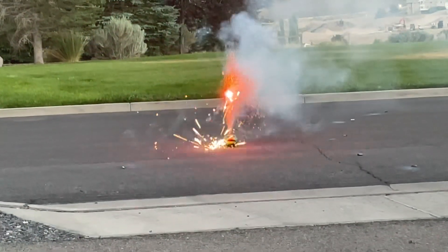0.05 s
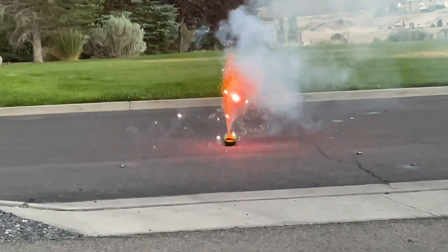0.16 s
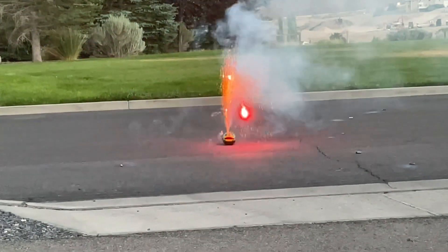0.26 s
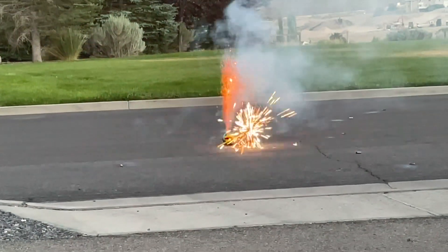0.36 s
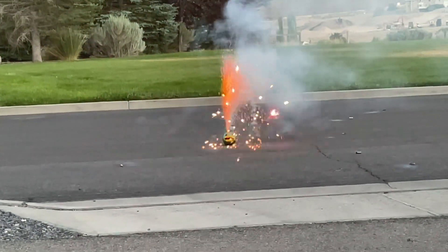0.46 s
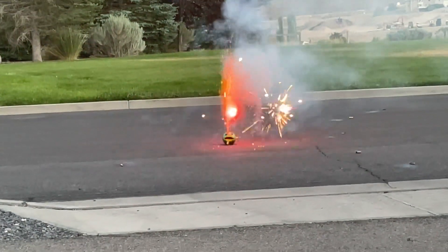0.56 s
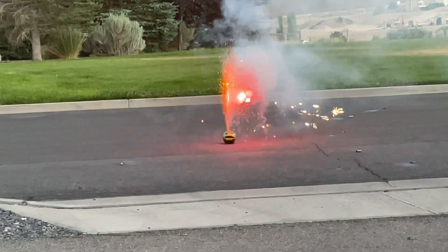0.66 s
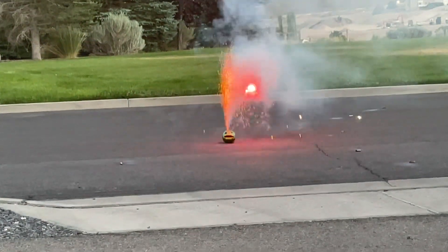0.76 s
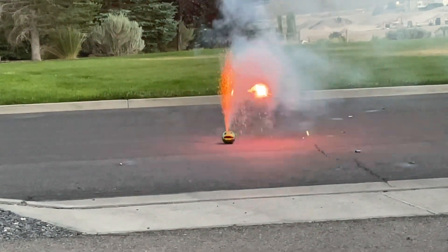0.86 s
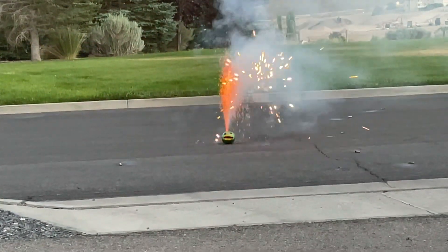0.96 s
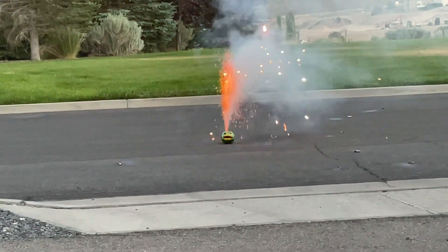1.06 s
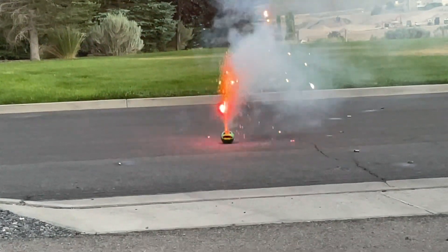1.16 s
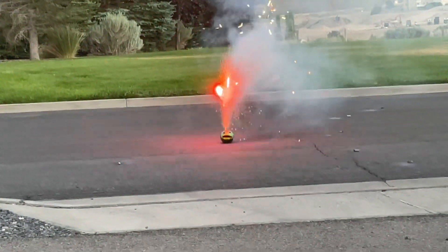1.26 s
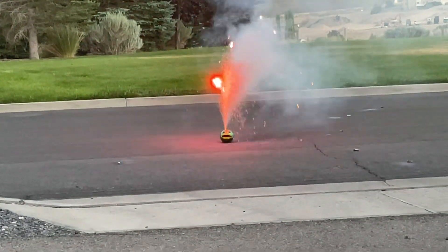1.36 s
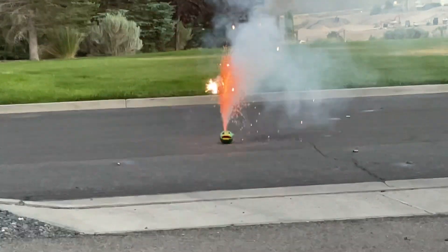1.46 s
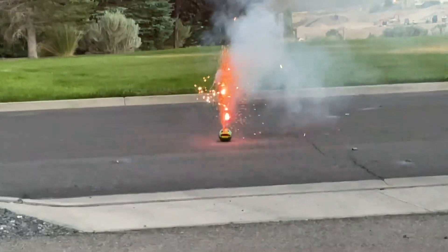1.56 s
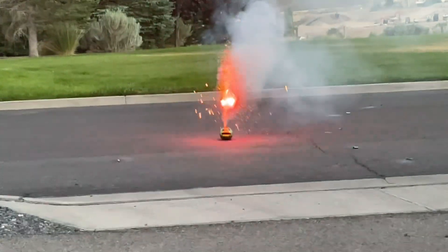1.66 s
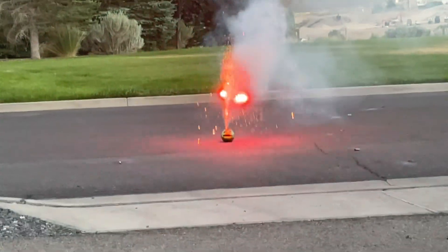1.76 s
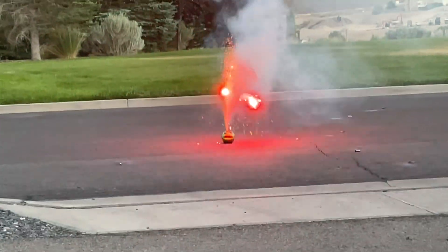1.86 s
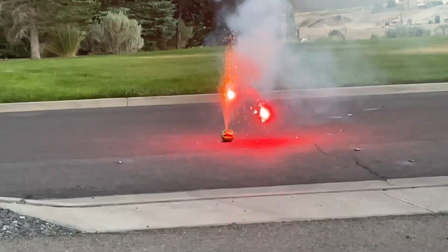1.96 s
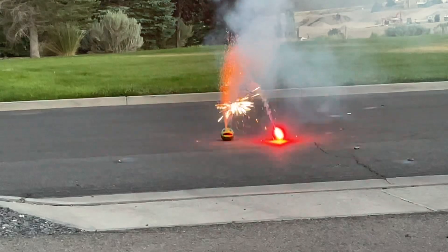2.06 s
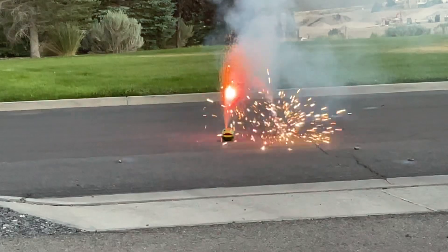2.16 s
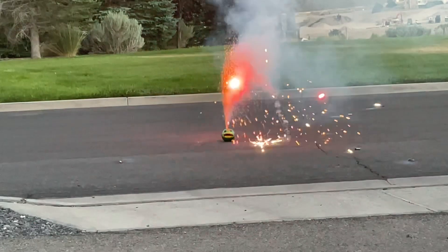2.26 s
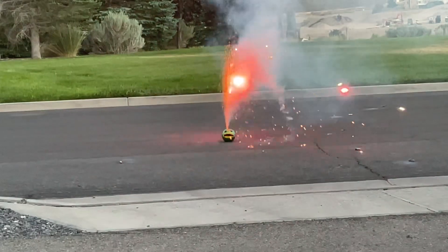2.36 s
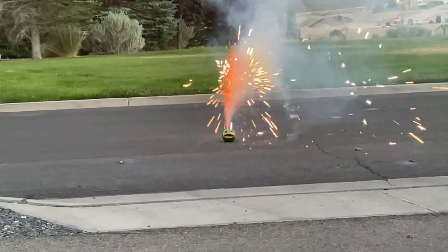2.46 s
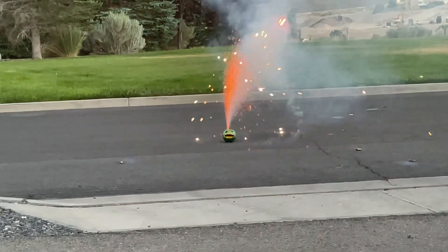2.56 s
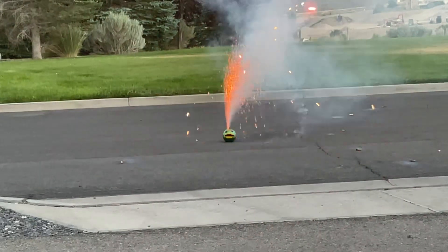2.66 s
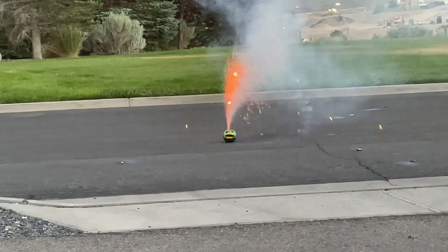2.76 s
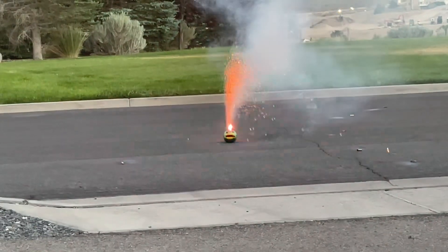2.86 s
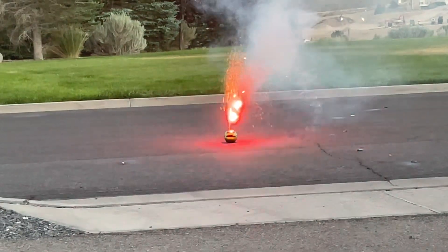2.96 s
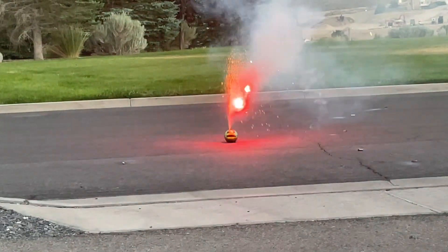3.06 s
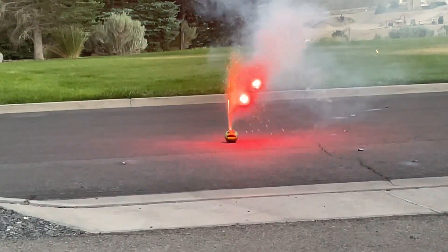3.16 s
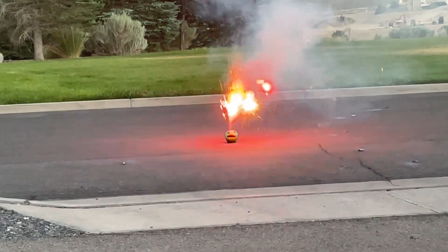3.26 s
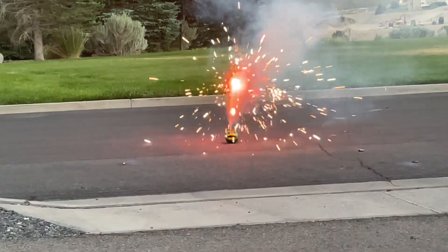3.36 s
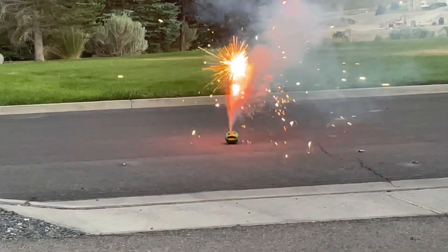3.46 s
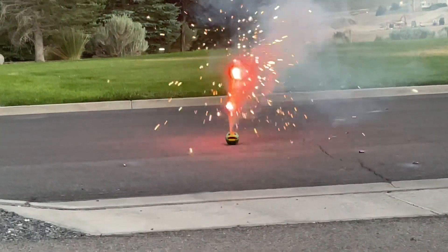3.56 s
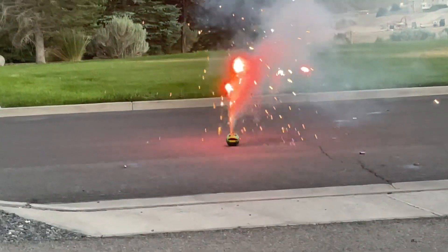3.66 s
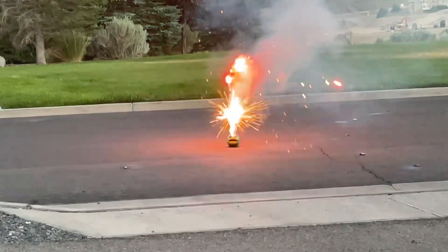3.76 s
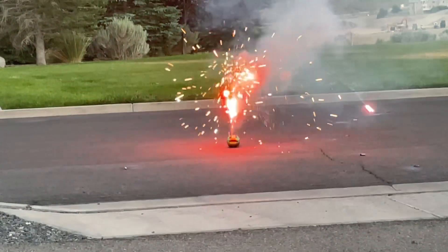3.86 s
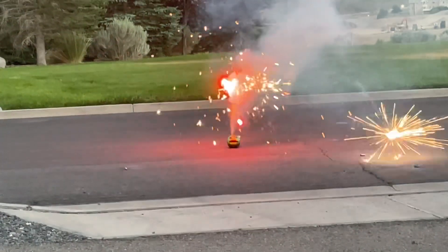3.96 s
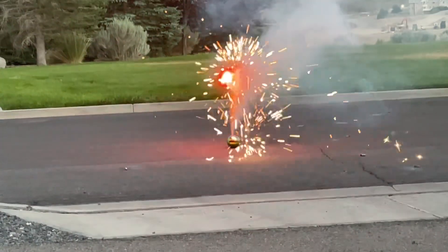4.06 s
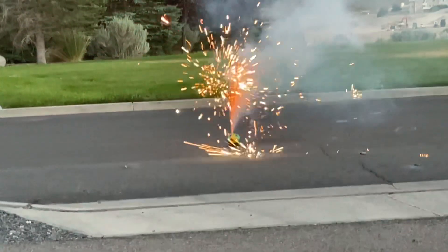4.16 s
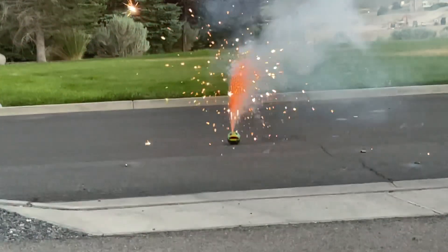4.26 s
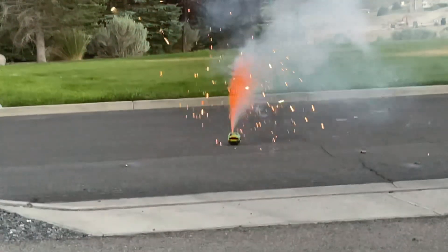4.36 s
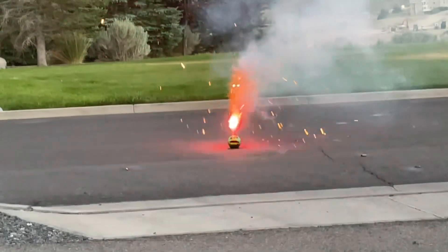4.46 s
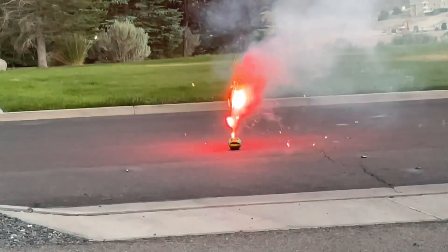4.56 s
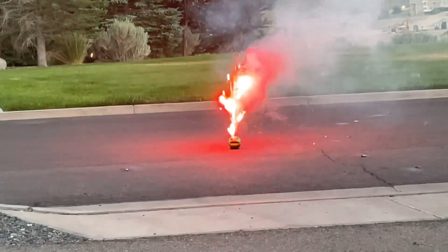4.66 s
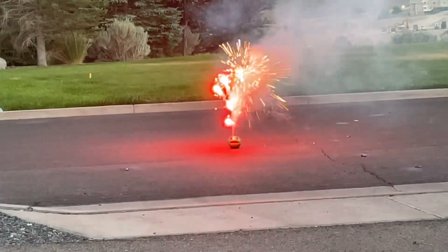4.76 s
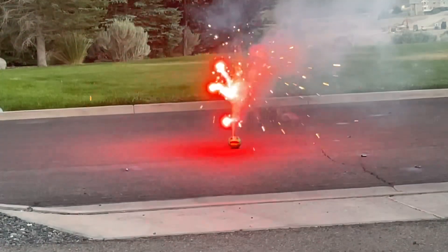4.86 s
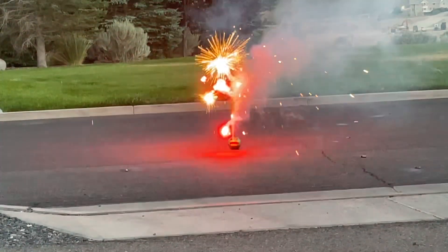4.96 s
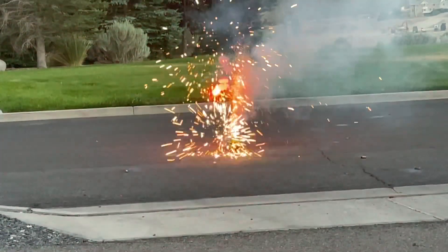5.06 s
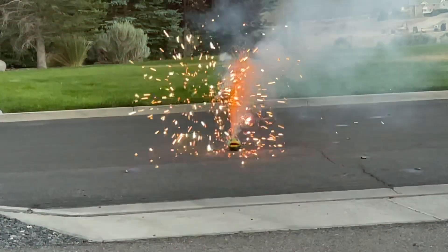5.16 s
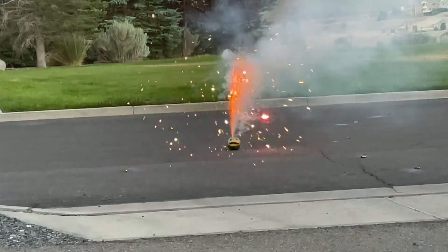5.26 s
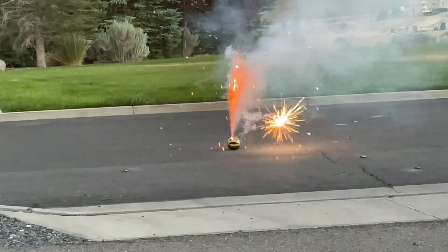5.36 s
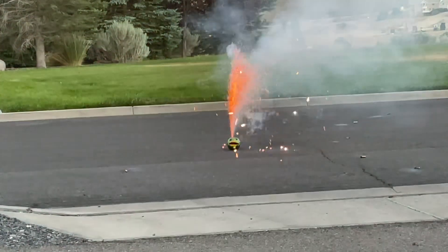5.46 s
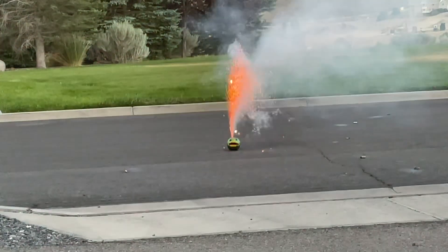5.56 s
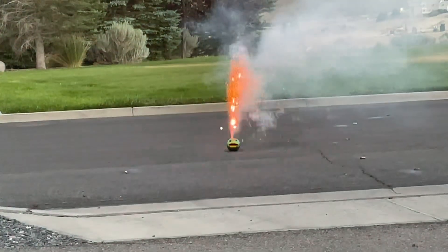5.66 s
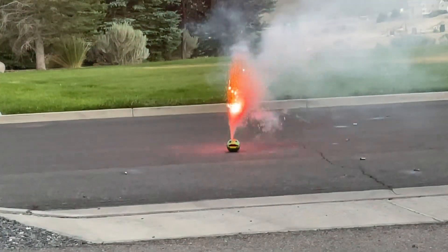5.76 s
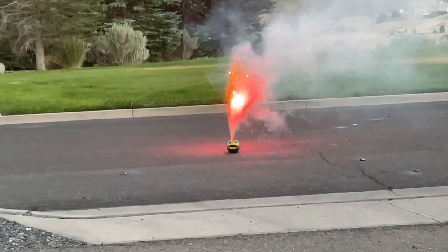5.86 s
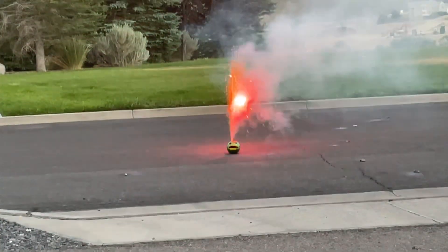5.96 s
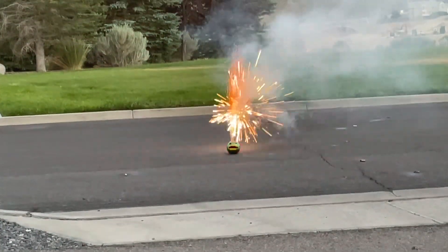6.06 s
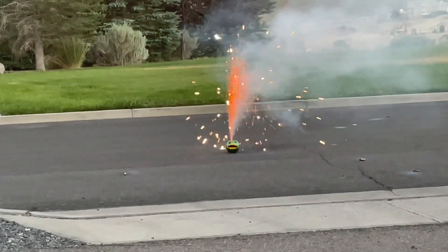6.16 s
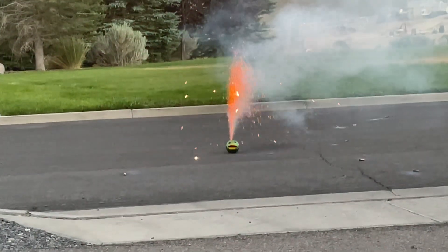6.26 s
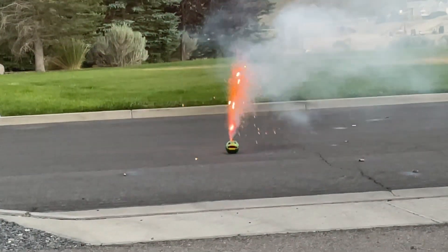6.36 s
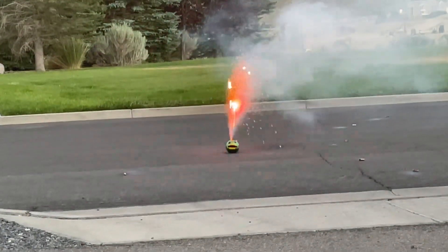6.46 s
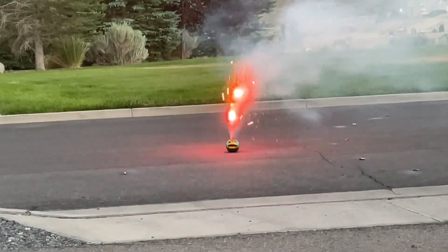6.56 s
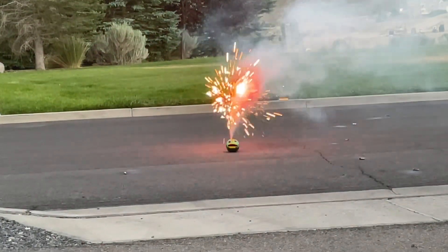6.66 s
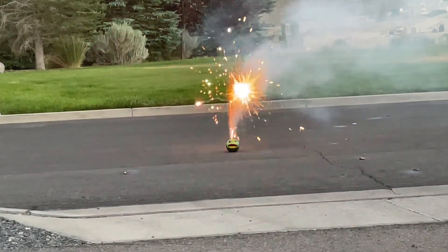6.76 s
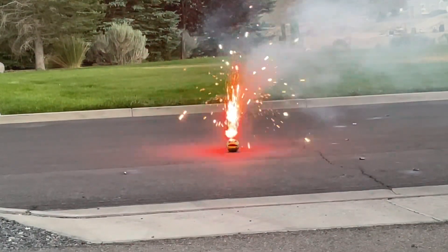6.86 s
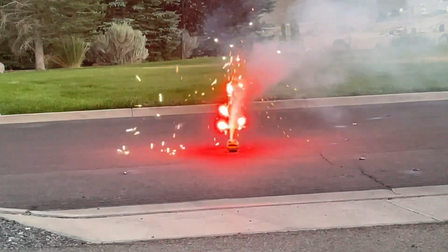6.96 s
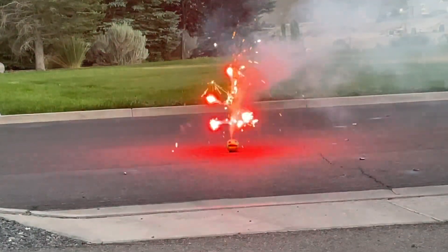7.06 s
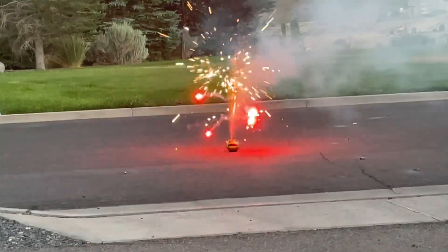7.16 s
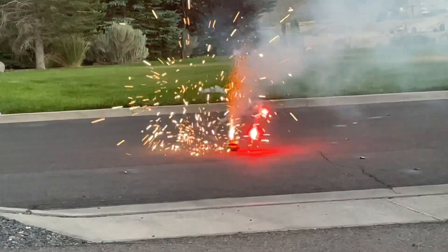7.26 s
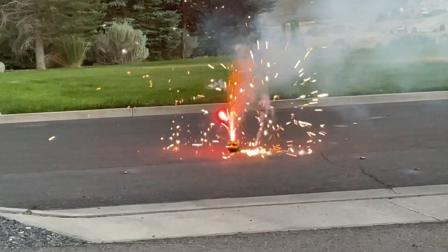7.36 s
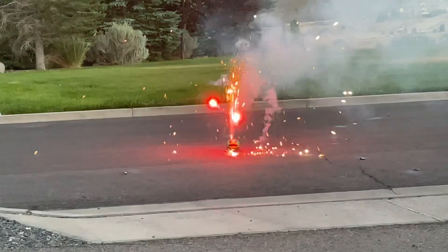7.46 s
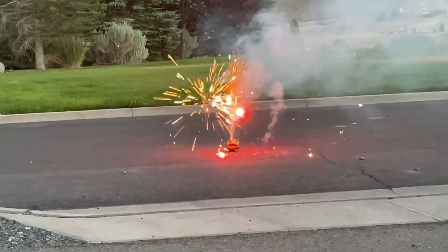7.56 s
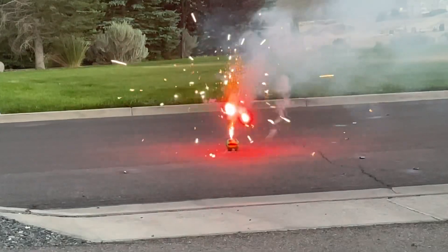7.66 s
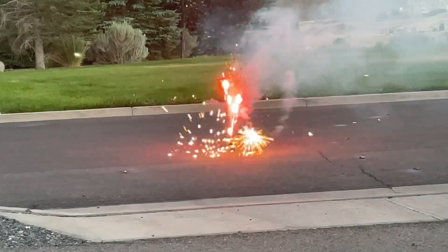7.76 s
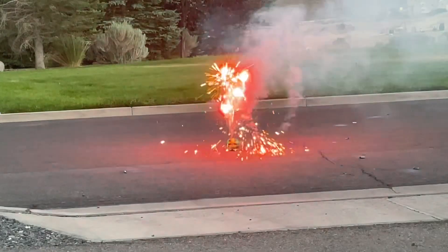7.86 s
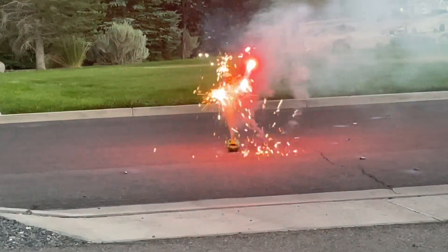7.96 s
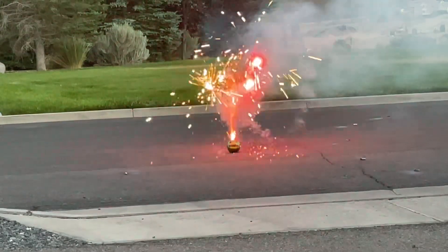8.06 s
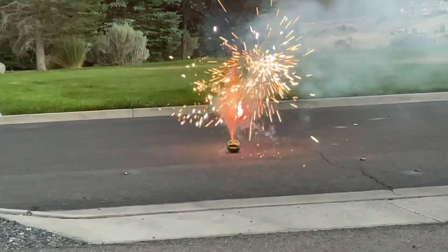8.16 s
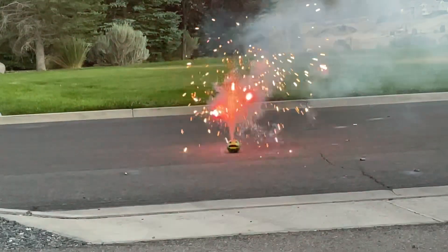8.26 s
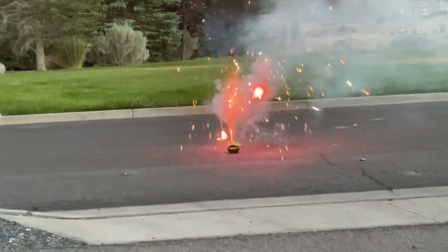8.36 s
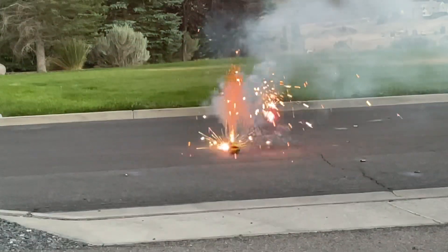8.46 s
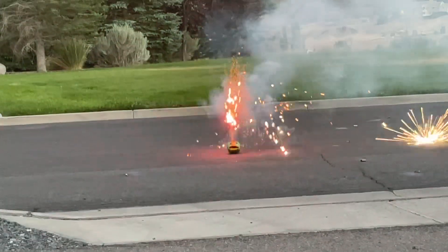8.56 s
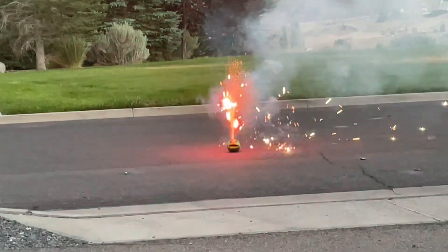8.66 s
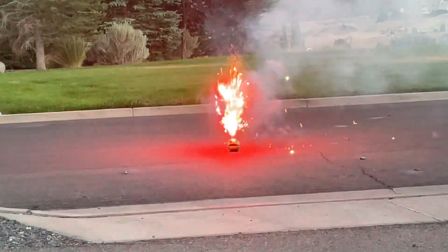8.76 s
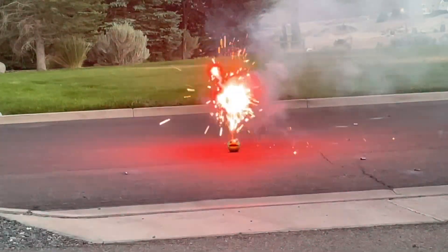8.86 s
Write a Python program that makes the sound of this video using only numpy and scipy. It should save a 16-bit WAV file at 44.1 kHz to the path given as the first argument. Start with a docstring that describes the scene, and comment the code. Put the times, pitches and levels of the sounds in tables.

```python
"""A sharp pop comes almost at once, over a soft hiss and a quiet street's wash, low rumble and faint hum.
A small fountain firework burns on the asphalt a few metres from a two-port microphone.
Its jet and the street are coloured noise that wanders in level; the hum is a wavering sine tone.
Thrown stars burst as shock fronts with crackle and sparks; each bounces off the road,
slaps back from the surroundings and dies away outdoors."""
import sys
import numpy as np
from scipy import signal
from scipy.fft import rfft, irfft, next_fast_len
from scipy.io import wavfile
from scipy.ndimage import uniform_filter1d

SR = 44100
rng = np.random.default_rng(int(sys.argv[2]) if len(sys.argv) > 2 else 0)


def to_wav(s):
    """Save 16-bit WAV."""
    ch = np.atleast_2d(s).T  # columns
    pcm = np.round(np.clip(ch, -1, 1) * 32767)  # PCM
    wavfile.write(sys.argv[1], SR, pcm.astype(np.int16))


N = 393813

# the street's distant wash: (frequency [Hz], relative level [dB per Hz])
WASH_COLOUR = [(20, -44), (150, -3.5), (330, 3.5), (450, -2.5), (580, -6.5), (830, -0.5), (1200, -2),
               (1550, -7.5), (2150, -20.5), (3000, -27.5), (6000, -60)]
# the street's low rumble: (frequency [Hz], relative level [dB per Hz])
RUMBLE_COLOUR = [(10, -65.5), (22, -29.5), (35, -20.5), (55, -2), (72, 0), (88, 3.5), (110, 1.5),
                 (130, -5.5), (155, -10), (220, -19.5), (260, -19), (400, -30), (900, -63.5)]
# one low swell in the rumble: (time of peak [s], half length [s], rise [dB])
RUMBLE_SWELL = (3.74, 0.12, 8.7)
# level of the rumble and the typical size of its slow wander
RUMBLE_DB, RUMBLE_WANDER_DB = -50.5, 1.1
# pitch and level of the faint hum, around which it wavers
HUM_HZ, HUM_DB = 120.5, -52.5

# distinct echoes: (delay [s], level [dB], smear [s])
SLAPS = [(0.016, -22, 0.0034), (.038, -25.5, 0.0044), (0.0411, -22.5, 0.002), (.126, -41, .004)]
# colour of the scatter from kerbs, trees and houses: (frequency [Hz], gain [dB])
SCATTER_COLOUR = [(100, 8), (300, -1.5), (1000, 2), (3000, 5), (7000, 8.5), (10000, -2.5), (14000, 4)]
# how long the street's echo takes to fall by 60 dB: (frequency [Hz], time [s])
STREET_DECAY = [(150, 0.53), (1000, 0.31), (3000, 0.49), (6500, 0.35), (14000, 0.28)]

# how hard the fountain burns: (time [s], level of its hiss before flutter and surge [dB])
BURN_CURVE = [(0, -68.5), (1.1, -67), (1.9, -67), (2.6, -74), (2.9, -66), (3.65, -62), (4.4, -64.5),
              (4.8, -62), (5.8, -65), (6.0, -69.5), (6.45, -67.5), (6.7, -62.5), (8.93, -59.5)]
# the jet's hiss: (frequency [Hz], relative level [dB per Hz])
HISS_COLOUR = [(1200, -12), (2200, 1.5), (2700, 5), (3100, -8.5), (3700, -2.5), (4400, -10.5), (5200, -19),
               (6500, -35), (9000, -38)]
# the fizz of the flaring flame: (frequency [Hz], relative level [dB per Hz])
FIZZ_COLOUR = [(3000, -15.5), (5000, 6), (7500, -2), (10000, -12), (13000, 1), (16000, -5)]
# the fizz grows faster than the hiss: its level when the hiss is at FULL_BURN_DB, and dB per dB of hiss
FULL_BURN_DB, FIZZ_DB, FIZZ_GROWTH = -62, -74, 3.9

# bursting stars: (time [s], level [dB], weight: + a deep boom, - a thin crack [dB],
# knock: fullness near 1 kHz [dB], height above the road [m])
STAR_BURSTS = [(0.0607, -11.5, -5, -0.5, 0.6), (0.3378, -34.0, 6.5, 2.5, 0.96),
               (0.361, -13, 0.5, 2.5, 0.57), (0.569, -25, 0, 0, 0.523), (0.666, -35.5, 1, 3.5, 0.49),
               (0.8907, -15.5, -0.5, 0.5, 0.29), (1.219, -24.5, -2, 1.5, 0.58), (1.26, -23, -14, 0.5, 0.55),
               (1.5311, -47.5, -14, 1, 0.424), (1.611, -33.5, -0.5, -5.5, 1.1),
               (2.063, -35.5, 4.5, 2, 0.71), (2.0991, -12.5, -0.5, 1, 0.58), (2.2656, -31, -1.5, 2.5, 0.64),
               (2.4331, -9.5, -0.5, -4, 1.1), (2.7013, -38, -5.5, 1, 0.49), (3.2914, -9.5, 0, -2.5, 0.6),
               (3.4105, -22.0, 0, -1.5, 0.68), (3.48, -18.5, 2.5, -8, 0.88), (3.5024, -17.5, -7, -1, 0.56),
               (3.7828, -17.5, 1.5, 1.5, 0.42), (3.9479, -24, 6, -2, 0.72), (3.9786, -10.5, -3, 2.5, 1.15),
               (4.0404, -20, 6, 1, 0.77), (4.0491, -16, -7, 1, 0.28), (4.0596, -24, -5, -3.5, 0.45),
               (4.119, -32.5, 6.5, -2, 1.1), (4.1678, -13.5, -1.5, 4, 0.57), (4.7495, -30.5, 1.5, 1, 0.48),
               (4.9722, -30, 6.5, 6, 0.49), (4.9934, -18, 2, -3, 0.8), (5.0408, -16, 1, 4.5, 0.58),
               (5.1101, -15, 3.5, -4.5, 0.8), (5.1267, -11.5, 0.5, 0, 0.85), (5.3852, -17.5, 1.5, 1, 0.67),
               (6.0664, -20, 3.5, -3, 0.738), (6.6377, -26.5, 5, 4, 0.3), (6.7827, -26, 3.5, -6.5, 0.29),
               (6.944, -13.0, 2.5, 1, 0.55), (7.037, -29, -4.5, -3.5, 0.48), (7.0831, -35, -8, -9, 0.67),
               (7.1281, -13, -1.5, -0.5, 0.39), (7.223, -18.0, 9.5, 7.5, 0.57),
               (7.2248, -8.5, -2, -6.5, 0.93), (7.3289, -11, -1, -2, 0.576), (7.3538, -20.5, 5.5, 4, 0.72),
               (7.566, -16, 0.5, -4.5, 0.84), (7.639, -9.0, -3, -1, 0.341), (7.7184, -17.0, 0, 1, 0.36),
               (7.7225, -17.5, 1.5, 3.5, 0.68), (7.7761, -29.5, 6, 4, 0.49), (7.858, -31.5, 5, -2, 0.45),
               (7.9463, -20, -3.5, 0, 0.55), (7.9934, -22.5, -0.5, -2.5, 0.32), (8.0018, -20.5, -4, -8, 1),
               (8.019, -21, -3.5, -6, 0.81), (8.0454, -14, -3, -3.5, 0.89), (8.0845, -21.5, -1, -3, 0.34),
               (8.1221, -16.5, -2, -4, 0.3), (8.1393, -19, -6, -3, 0.34), (8.145, -21.5, 6, 3.5, 1.15),
               (8.2538, -31, -4.5, -4.5, 0.555), (8.3422, -17, 3, 0.5, 0.596), (8.4084, -33, 4, 6, 0.696),
               (8.4186, -22.0, 4, 1.5, 0.31), (8.4953, -14, -0.5, 5.5, 0.62), (8.5864, -9, -6, 0, 0.55),
               (8.612, -18, 3, 7.5, 0.54), (8.8438, -25.5, 5, -2, 1)]
# colour of a burst: (frequency [Hz], gain [dB])
BLAST_COLOUR = [(40, -4.5), (100, 23.5), (200, 30), (340, 35), (640, 28), (800, 34), (1250, 29.5),
                (1600, 24), (2200, 19.5), (2750, 22.5), (3300, 18), (6500, 12.5), (10000, 6.5),
                (14000, 10.5)]
# how a star's weight tilts its burst: (frequency [Hz], gain [dB per dB of weight])
WEIGHT_TILT = [(380, 0.95), (800, -0.12), (1600, -0.16), (3500, -0.45)]
# where a star's knock lies: (frequency [Hz], gain [dB per dB of knock])
KNOCK_HUMP = [(380, 0.06), (800, 1.02), (1250, 1), (2000, 0.99), (3200, 0)]
# where the microphone stands; this sets how late the road bounce arrives
MIC_HEIGHT_M, DISTANCE_M, SOUND_M_PER_S = 1.4, 6, 343

# delay of both ports: (frequency [Hz], delay [ms])
PORT_DELAY = [(60, 8.5), (140, 7.5), (210, 6.5), (310, 3), (450, 2.3), (800, 0.04), (1300, 0.4),
              (1530, 0.86), (1800, 0.5)]
# how the two ports differ: (frequency [Hz], left minus right [dB], phase by which left leads [radians])
PORT_BALANCE = [(150, -.3, 0), (300, -1, -.2), (370, -5, -.1), (470, -6, .8), (510, 0, 1.9),
                (570, 4.5, 1.9), (690, 3, 1.1), (730, 8, 1.9), (790, 12, .8), (900, 7, .65), (1130, 0, .35),
                (1250, -4.5, .9), (1370, -4, 1.7), (1460, 2, 2.4), (1600, 6, 5.3), (1850, 1, 5.7),
                (2000, -5, 4.6), (2170, 2.5, 4.1), (2350, -1.5, 4), (2560, 0, 3.14), (2800, 0, 1.95),
                (3550, 0, .25), (4600, 0, -.15), (6200, 0, -.9), (9900, 0, -3.15), (12000, 0, -4.55),
                (15000, 0, -6.5)]
# upper limit of the sound
EDGE_HZ = 16200


def gain_of(db):
    """Turns decibels into amplitude."""
    return 10 ** (np.asarray(db) / 20)


def evened(x):
    """Scales a sound to rms 1."""
    return x / np.sqrt(np.mean(x ** 2) + 1e-20)


def read(points, hz):
    """Reads a table between its points, along a log-frequency axis."""
    f, value = np.transpose(points)
    return np.interp(np.log(hz + 1), np.log(f + 1), value)


def follow(rows):
    """Gives each column of a time table a value at every sample."""
    s, *columns = np.transpose(rows)
    return [np.interp(np.arange(N) / SR, s, c) for c in columns]


def add(mix, s, sound):
    """Mixes a sound in at time s, cutting what runs past the end."""
    start = max(round(s * SR), 0)
    part = mix[..., start:][..., :sound.shape[-1]]
    part += sound[..., :part.shape[-1]]


def causal(db):
    """Spectrum of the most compact causal pulse with this gain curve."""
    mirrored_db = np.concatenate([db, db[-2:0:-1]])
    log_gain = np.log(gain_of(mirrored_db))
    return np.exp(signal.hilbert(log_gain).conj())[:len(db)]


def noise(points):
    """Steady noise of rms 1, coloured by a table."""
    hz = np.fft.rfftfreq(N, 1 / SR)
    white = rfft(rng.standard_normal(N))
    return evened(irfft(white * gain_of(read(points, hz)), N))


def drift(rate_hz):
    """Slow random wander of rms 1: noise with all but its lowest frequencies removed."""
    hz = np.fft.rfftfreq(N, 1 / SR)
    white = rfft(rng.standard_normal(N))
    return evened(irfft(white * np.exp(-(hz / rate_hz) ** 2), N))


def spray(decay_s, size, lumps_db=3):
    """Two unrelated dying bursts of noise with energy 1, lumpy where single reflections stand out."""
    lumps = evened(uniform_filter1d(rng.standard_normal(size), size=100))
    fade = np.exp(-np.arange(size) / SR / decay_s)
    burst = rng.standard_normal((2, size)) * gain_of(lumps_db * lumps) * fade
    return burst / np.linalg.norm(burst, axis=1, keepdims=True)


def wash(level_db=-51, wander_db=1.63, wander_hz=7.3):
    """Distant wash: coloured noise whose level wanders."""
    return noise(WASH_COLOUR) * gain_of(level_db + wander_db * drift(wander_hz))


def rumble(wander_hz=3):
    """Low rumble: bass noise that wanders in level and swells once."""
    t = np.arange(N) / SR
    peak_s, half_s, rise_db = RUMBLE_SWELL
    swell_db = rise_db * np.exp(-((t - peak_s) / half_s) ** 2)
    level_db = RUMBLE_DB + RUMBLE_WANDER_DB * drift(wander_hz) + swell_db
    return noise(RUMBLE_COLOUR) * gain_of(level_db)


def hum(waver_db=2, waver_turns=0.16):
    """Hum of a machine: one sine tone, wavering in phase and level."""
    turns = HUM_HZ * np.arange(N) / SR + waver_turns * drift(2.0)
    tone = np.sqrt(2) * np.sin(2 * np.pi * turns)  # rms 1
    return tone * gain_of(HUM_DB + waver_db * drift(1.8))


def background():
    """The street's own air: wash, rumble and hum added together."""
    return wash() + rumble() + hum()


def street(size, near_db=-13, near_s=0.0064, far_db=-19.0):
    """Spectra of one pop's echoes (from ahead, from the sides): quick scatter, a few slaps, a thin tail."""
    # open-air tail: noise that dies at its own pace at each pitch
    hz, t, z = signal.stft(rng.standard_normal((2, size)), SR, nperseg=256)
    fade_db = -60 * t / read(STREET_DECAY, hz)[:, None]
    far = signal.istft(z * gain_of(fade_db), SR, nperseg=256)[1]
    response = np.zeros((2, size))
    add(response, .006, gain_of(far_db) * far / np.linalg.norm(far[0]))
    add(response, .0025, gain_of(near_db) * spray(near_s, size=4096))
    for delay_s, db, smear_s in SLAPS:
        add(response, delay_s, gain_of(db) * spray(smear_s, size=1024))
    colour_db = read(SCATTER_COLOUR, np.fft.rfftfreq(size, 1 / SR))
    return rfft(response) * gain_of(colour_db)


def jet(flutter_db=1.5, sputter_db=2, flutter_hz=25, surge_db=1.5, surge_hz=5):
    """Gas hisses from the nozzle, surging and fluttering; the harder it burns, the more fizz the flame adds."""
    hiss_db, = follow(BURN_CURVE)
    fizz_db = FIZZ_DB + FIZZ_GROWTH * (hiss_db - FULL_BURN_DB)
    flutter = drift(flutter_hz)  # shared by hiss and fizz
    surge = gain_of(surge_db * drift(surge_hz))
    hiss = noise(HISS_COLOUR) * gain_of(hiss_db + flutter_db * flutter)
    fizz = noise(FIZZ_COLOUR) * gain_of(fizz_db + sputter_db * flutter)
    return surge * (hiss + fizz)


def sparks(size, count=8, spark_db=-29, life_s=0.14, fade_db_per_s=110):
    """Spectrum of the tiny cracks of the sparks that a bursting star throws; the later, the weaker."""
    cracks = np.zeros(size)
    for delay_s in rng.uniform(.008, life_s, count):
        level_db = spark_db - fade_db_per_s * delay_s
        add(cracks, delay_s, gain_of(level_db) * spray(0.00079, size=256)[0])
    return rfft(cracks)


def shock(bounce_s, size, first=0.3, shatter=1.5, shatter_hz=2100):
    """Spectrum of a shock front, arriving twice because of the road, amid the shattering star's brief crackle."""
    hz = np.fft.rfftfreq(size, 1 / SR)
    burst = rng.standard_normal(120) * signal.windows.tukey(120, .7)
    treble_only = hz ** 2 / (hz ** 2 + shatter_hz ** 2)
    crackle = rfft(burst / np.linalg.norm(burst), size) * treble_only
    bounce = np.exp(-2j * np.pi * hz * bounce_s)
    paths = first + bounce + shatter * crackle
    # ripples the spectrum without tilting it
    return paths / np.sqrt(uniform_filter1d(abs(paths) ** 2, size=1201))


def stars(size=20480):
    """All the bursting stars (ahead, sides); each bursts at its own place and so has its own echoes."""
    hz = np.fft.rfftfreq(size, 1 / SR)
    blast_db, tilt, hump = read(BLAST_COLOUR, hz), read(WEIGHT_TILT, hz), read(KNOCK_HUMP, hz)
    run_up = 256  # samples of room before the pop, for the filters' ringing ahead of it
    out = np.zeros((2, N))
    for s, level_db, weight_db, knock_db, height_m in STAR_BURSTS:
        extra_path_m = 2 * height_m * MIC_HEIGHT_M / DISTANCE_M
        paths = street(size)
        paths[0] += shock(extra_path_m / SOUND_M_PER_S, size) + sparks(size)
        colour_db = level_db + blast_db + weight_db * tilt + knock_db * hump
        pop = irfft(paths * causal(colour_db))
        add(out, s - run_up / SR, np.roll(pop, run_up, axis=1))
    return out


def ports(x):
    """Two ports hear one sound with their own gain and phase; bass comes late, so each pop chirps downward."""
    size = next_fast_len(N + SR)
    hz = np.fft.rfftfreq(size, 1 / SR)
    # adding up the delay over frequency gives the phase
    late_turns = np.cumsum(read(PORT_DELAY, hz)) * hz[1] / 1000
    late = np.exp(-2j * np.pi * late_turns)
    port_hz, balance_db, lead = np.transpose(PORT_BALANCE)
    # half of each difference goes to the left, the opposite half to the right
    left_gain = gain_of(np.interp(hz, port_hz, balance_db) / 2)
    left = left_gain * np.exp(.5j * np.interp(hz, port_hz, lead))
    pair = np.array([left, 1 / left])
    pair /= np.sqrt(np.mean(abs(pair) ** 2, axis=0))  # same total power at every pitch
    return irfft(rfft(x, size) * late * pair, size)[:, :N]


def scene(side_echo_db=-12, side_air_db=-19):
    """The firework straight ahead; a little of the echo and street noise differs between the sides."""
    pops, side_echoes = stars()
    ahead = pops + jet() + background()
    sides = gain_of(side_echo_db) * side_echoes + gain_of(side_air_db) * background()
    return ports(ahead) + ports(sides) * np.array([[1], [-1]])  # added left, subtracted right


def record(dry):
    """Rounds off the loudest peaks, then removes what lies above the band limit."""
    rounded = dry / (1 + (dry / .92) ** 6) ** (1 / 6)
    low_pass = signal.firwin(255, EDGE_HZ, window=("kaiser", 9), fs=SR)
    return signal.oaconvolve(rounded, low_pass[None], "same")


dry = scene()
out = record(dry)
to_wav(out)
```